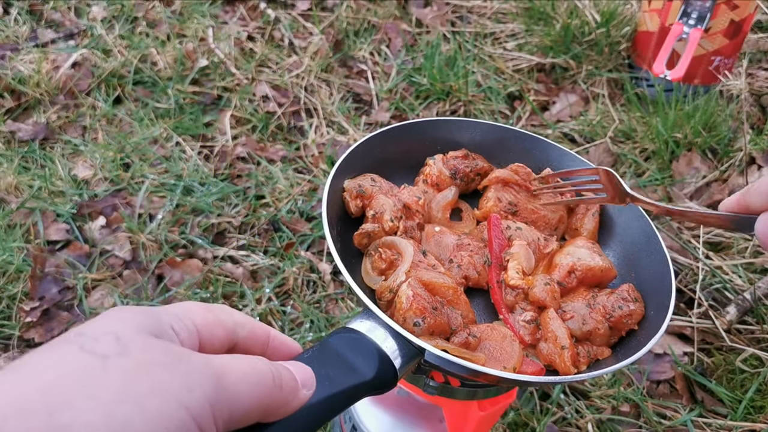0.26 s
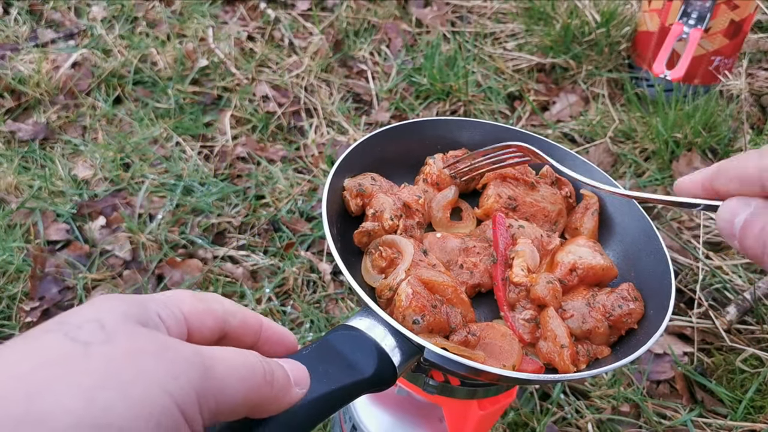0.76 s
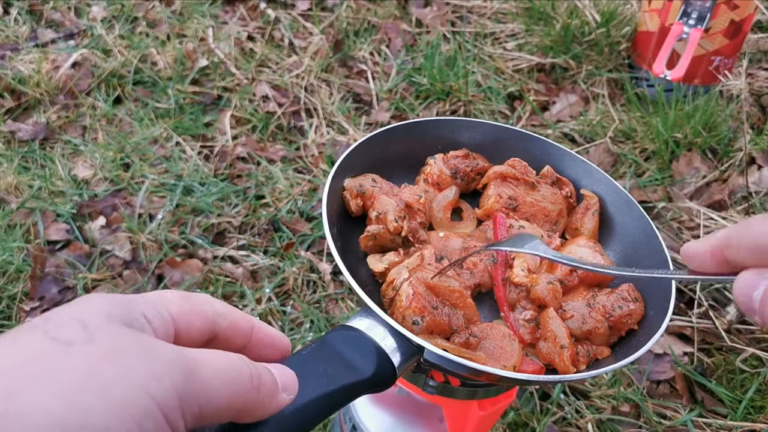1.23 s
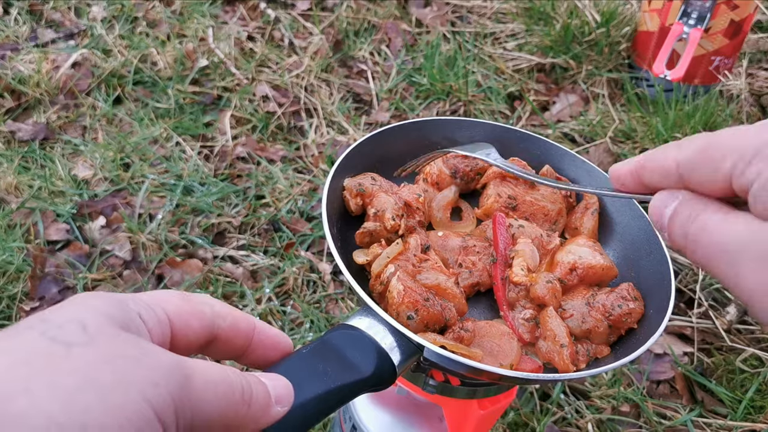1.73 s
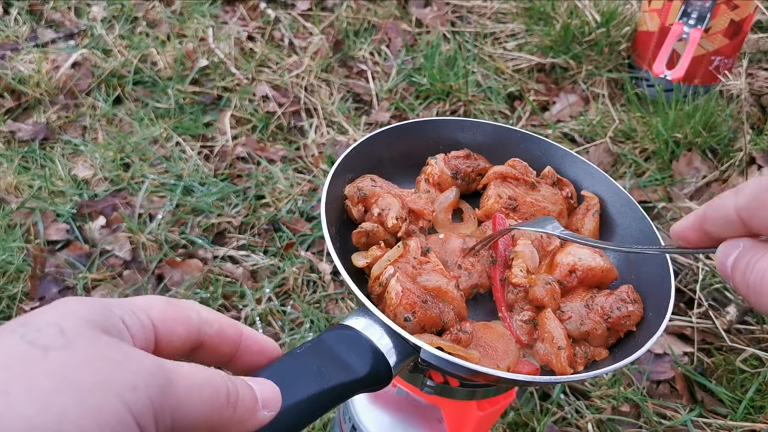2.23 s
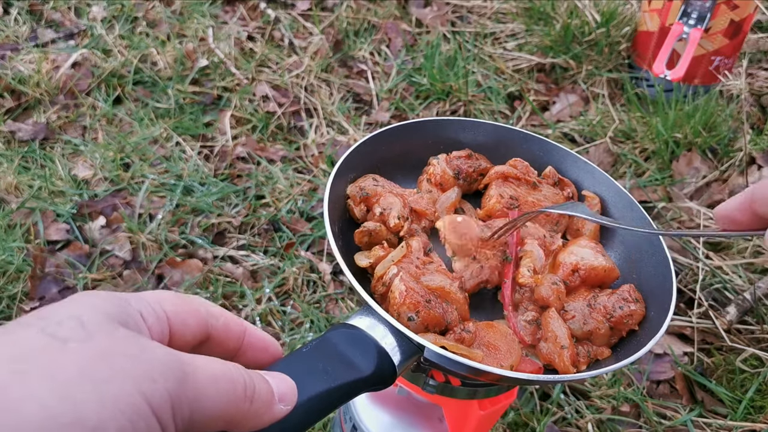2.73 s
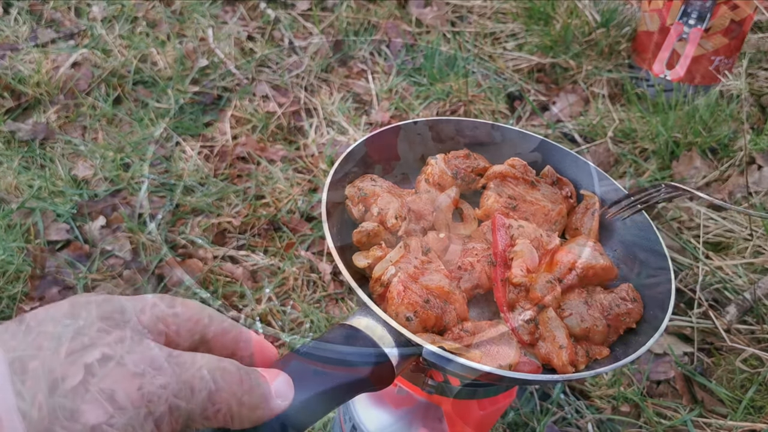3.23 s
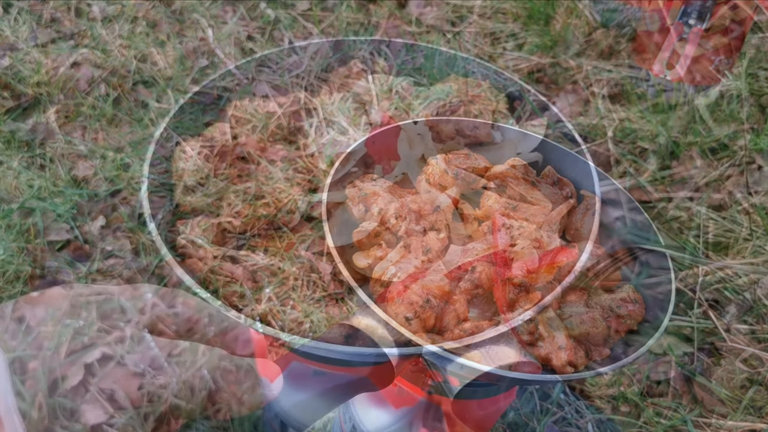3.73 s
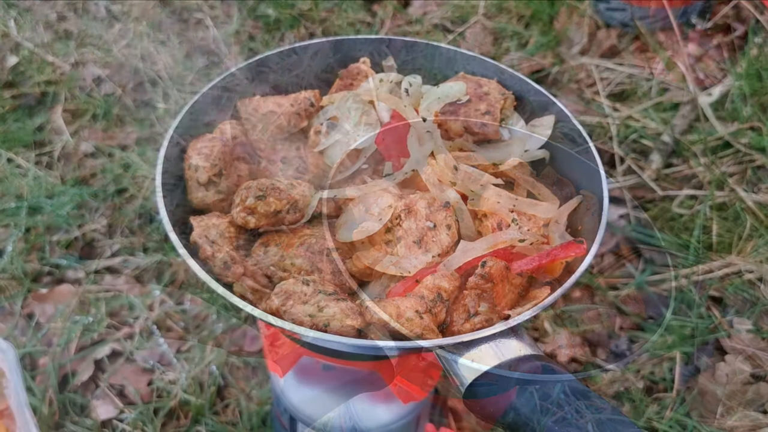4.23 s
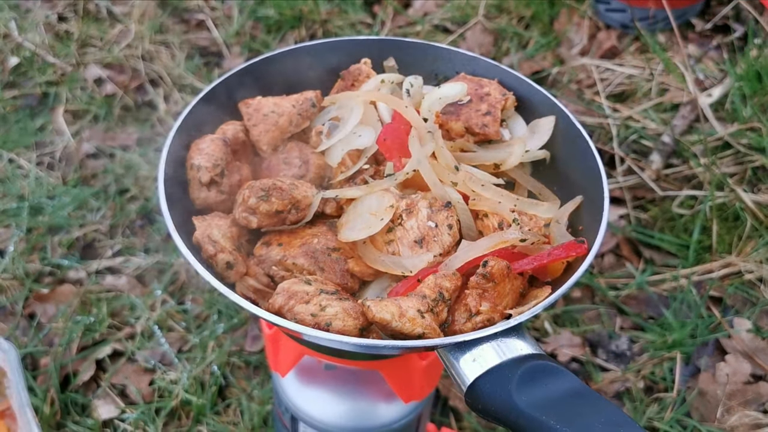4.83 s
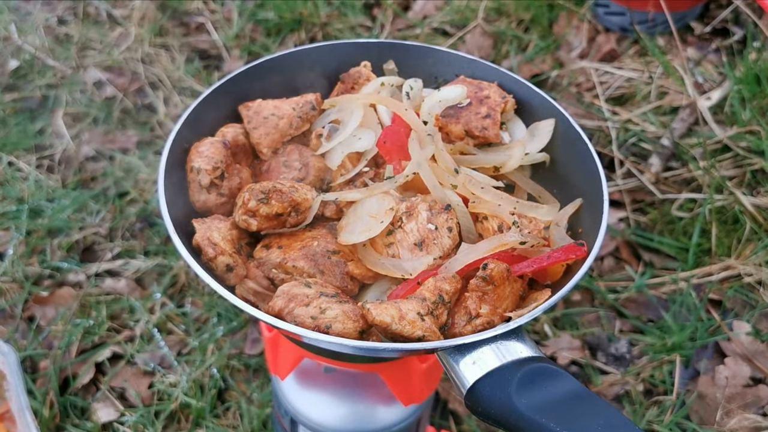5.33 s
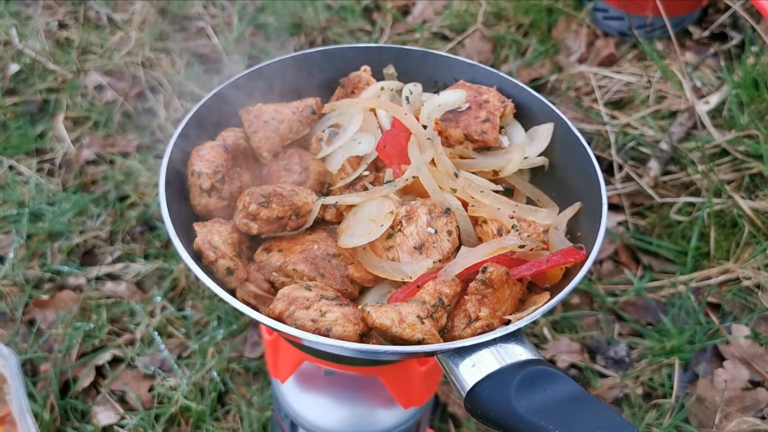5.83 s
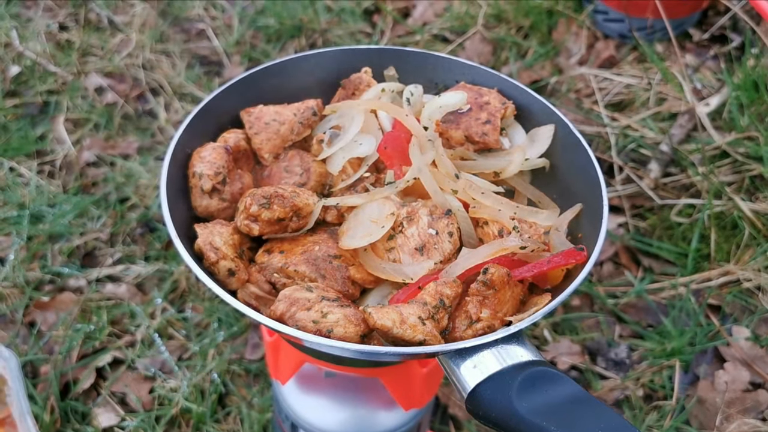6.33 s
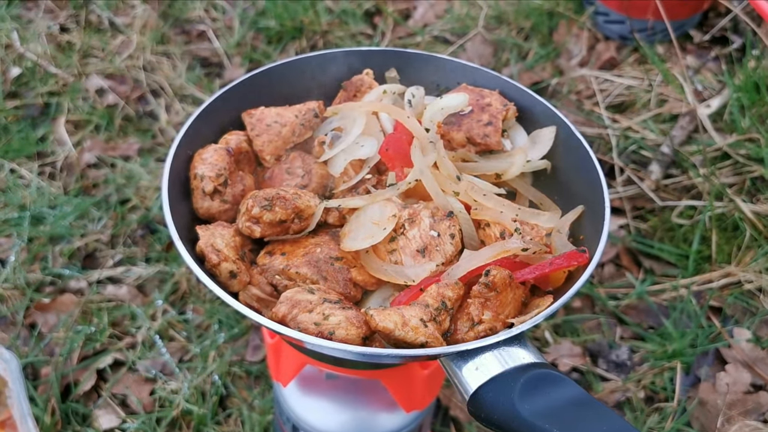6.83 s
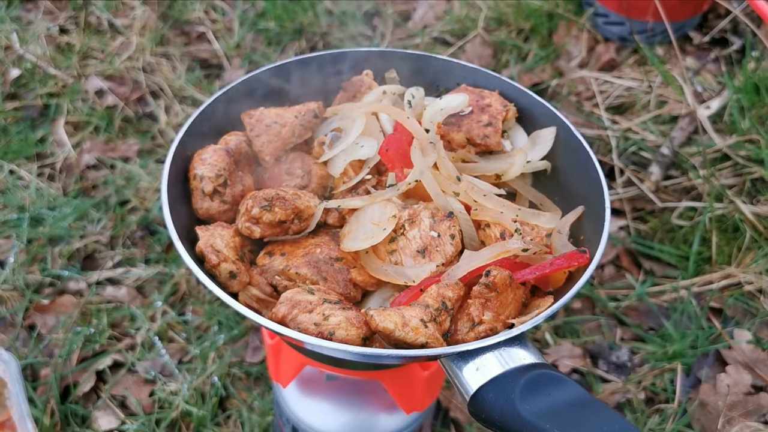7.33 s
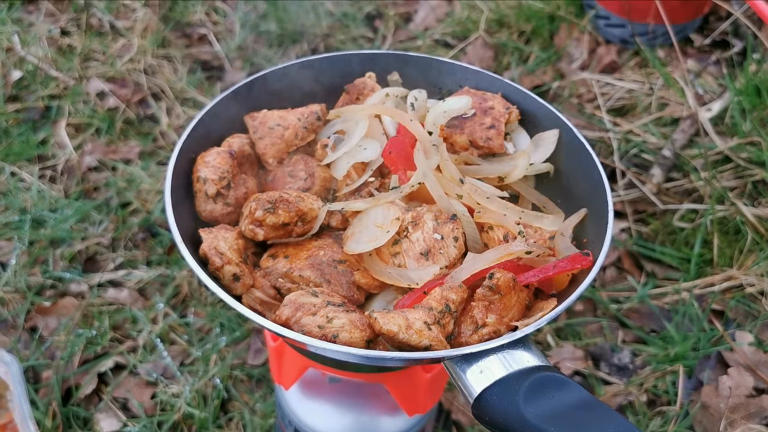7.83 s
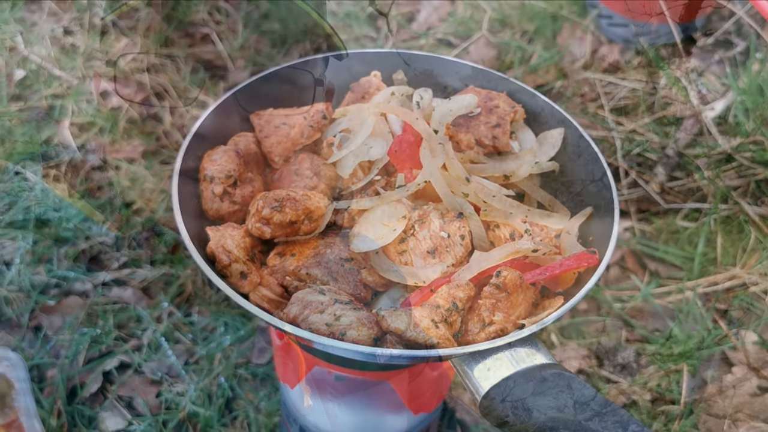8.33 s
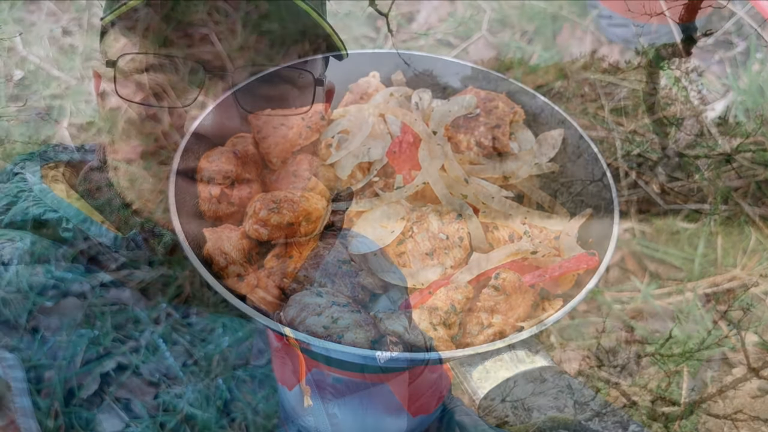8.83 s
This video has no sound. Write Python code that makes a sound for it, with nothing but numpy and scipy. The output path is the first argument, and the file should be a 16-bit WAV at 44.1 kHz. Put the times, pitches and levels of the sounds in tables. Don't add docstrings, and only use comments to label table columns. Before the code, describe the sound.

Quiet gas rush and delicate bubbling from a far mono microphone, with small metallic and fatty ticks as a fork turns meat, and hissing squirts of juice. A blink of silence, then much louder frying close up in stereo, the burner roaring and humming low in spells, bubbles fizzing, hot fat snapping and spitting irregularly. Another blink of silence, then only faint open air with a low wind thump.

```python
import sys
import numpy as np
from scipy import signal
from scipy.fft import rfft, irfft, next_fast_len
from scipy.io import wavfile
from scipy.ndimage import uniform_filter1d

SR = 44100
rng = np.random.default_rng(int(sys.argv[2]) if len(sys.argv) > 2 else 0)


def volts_from_db(level):
    exponent = np.asarray(level, float) / 20
    return 10 ** exponent


def to_wav(sig):
    pcm = np.clip(np.atleast_2d(sig), -1, 1) * 32767
    pcm = np.round(pcm).astype(np.int16)
    wavfile.write(sys.argv[1], SR, pcm.T)


N = 399987
SIZE = next_fast_len(N + 8192)
HZ = np.maximum(np.arange(SIZE // 2 + 1) * SR / SIZE, 1.0)


def rms_one(x):
    return x / np.sqrt(np.mean(x ** 2) + 1e-20)


def in_time(rows):
    s, *columns = np.transpose(rows)
    return [np.interp(np.arange(N) / SR, s, column) for column in columns]


def at_hz(points):
    hz, value = np.array(points).T
    return np.interp(np.log(HZ), np.log(hz), value)


def bells(bumps):
    return sum(height / (1 + (2 * (HZ - hz) / max(width, 5)) ** 2) for hz, width, height in bumps)


def above(hz):
    return 1 / np.sqrt(1 + (hz / HZ) ** 6)


def drift(rate):
    r = np.exp(-40 * np.pi * rate / SR)
    steps = rng.standard_normal(N // 20 + 4002)
    slow = signal.lfilter([1], [1, -2 * r, r * r], steps)[4000:]
    return np.interp(np.arange(N) / 20, np.arange(len(slow)), rms_one(slow - slow.mean()))


def fade(full_s, silent_s):
    share = (np.arange(N) / SR - silent_s) / (full_s - silent_s)
    return 20 * np.log10(np.clip(share, 0.01, 1))


def path(tilt, bumps):
    cepstrum = irfft(np.log(volts_from_db(at_hz(tilt) + bells(bumps))), SIZE)
    cepstrum[1:SIZE // 2] *= 2
    cepstrum[SIZE // 2 + 1:] = 0
    return np.exp(rfft(cepstrum))


def through(x, way):
    return irfft(rfft(x, SIZE) * way, SIZE)[..., :N]


def heard(spectrum):
    x = irfft(spectrum, SIZE)[..., :N]
    return x / np.std(np.atleast_2d(x).mean(axis=0))


def both_ports(first, other):
    # (frequency [Hz], share [0-1])
    shared_curve = [(25, 0.9), (60, 0.98), (300, 1.02), (1100, 1.01), (1500, 0.62), (3000, 0.79),
                    (5000, 0.6), (7000, 0.27), (10000, 0.14), (15700, 0.17)]
    # (frequency [Hz], width [Hz], change of share [0-1])
    shared_bumps = [(395, 51, -0.51), (414, 21, -0.35), (1307, 170, -0.45), (1433, 115, 0.34),
                    (1860, 93, -0.43), (2060, 165, 0.18), (2460, 197, -0.47), (3260, 150, -0.67),
                    (3740, 150, -0.52), (4660, 150, -0.3), (4900, 240, -0.43), (5540, 150, -0.46),
                    (6300, 390, -0.26), (9740, 390, 0.35), (11860, 600, 0.19), (13580, 150, 0.37)]
    alike = np.clip(at_hz(shared_curve) + bells(shared_bumps), 0, 1)
    return np.array([first, alike * first + np.sqrt(1 - alike ** 2) * other])


def flame(flutter_db):
    return rfft(rng.standard_normal((2, N)) * volts_from_db(flutter_db * drift(5.9)), SIZE)


def fizz(per_s, size_db, clump_db, sharp, hiss_db, scatter_ms, count, biggest):
    born = rng.random(N) < per_s * volts_from_db(clump_db * (drift(40) + 0.7 * drift(9))) / SR
    sizes = born * volts_from_db(size_db * np.minimum(rng.exponential(1, N), biggest)) * rng.choice([-1, 1], N)
    dealt = rng.integers(0, count, N)
    shift = (rng.standard_normal(N) * scatter_ms * SR / 1000).astype(int)
    moved = np.clip(np.arange(N) + shift, 0, N - 1)
    grains, power = 0, 0
    for k, hz in enumerate(np.geomspace(1100, 17000, count)):
        burst = 1 / (1 + 1j * sharp * (HZ / hz - hz / HZ))
        mine = rms_one(sizes * (dealt == k))
        versions = [mine]
        if scatter_ms > 0:
            versions.append(np.bincount(moved, mine, N))
        grains = grains + rfft(versions, SIZE) * burst
        power = power + np.abs(burst) ** 2
    breath = volts_from_db(1.56 * drift(34) + 0.15 * drift(0.15))
    hiss = rfft(rng.standard_normal((len(grains), N)) * breath, SIZE)
    return grains / np.sqrt(power) + volts_from_db(hiss_db) * hiss


def with_parts(rows, parts):
    extra = [(s, db + part_db, hz * ratio, -60) for ratio, part_db in parts for s, db, hz, _ in rows]
    return list(rows) + extra


def pops(rows, t60, tail_db, bright_db, snap_db, way):
    out, t = np.zeros(N + 1024), np.arange(1024) / SR
    for s, db, hz, crack_db in rows:
        noise = rng.standard_normal(1024)
        tail = volts_from_db(tail_db - 60 * t / (5 * t60)) * uniform_filter1d(noise, size=30) * 5
        attack = 1 - np.exp(-t / 0.00015)
        ring = np.sin(2 * np.pi * hz * t) * (volts_from_db(-60 * t / t60) + tail) * attack
        crack = volts_from_db(crack_db + bright_db) * np.diff(noise, prepend=0) * volts_from_db(-60 * t / (0.9 * t60))
        crack[:4] += volts_from_db(snap_db) * np.hanning(6)[1:5]
        out[round((s + 0.0008) * SR):][:len(t)] += volts_from_db(db) * (ring + crack)
    middle = np.sqrt(np.mean(np.abs(np.atleast_2d(way)[0, (HZ > 2800) & (HZ < 6000)]) ** 2))
    return through(out[:N], way / middle)


def spits(rows, cycles, gain_db, way):
    out, t = np.zeros(N + 512), np.arange(256) / SR
    late_s = 0.0009
    near = np.sqrt(uniform_filter1d(np.abs(np.atleast_2d(way).mean(axis=0)) ** 2, size=SIZE // 30))
    for (s, db, hz), turn in zip(rows, rng.random(len(rows))):
        shape = volts_from_db(-60 * t * hz / cycles) * (1 - np.exp(-2 * t * hz))
        ring = np.sin(2 * np.pi * (hz * t + turn)) * shape
        out[round((s + late_s) * SR):][:len(t)] += volts_from_db(db + gain_db) * ring / near[round(hz * SIZE / SR)]
    return through(out[:N], way)


def open_air():
    # (frequency [Hz], level [dB per Hz])
    wind_tilt = [(25, -10.4), (60, 0.0), (130, -21.2), (300, -27.1), (1000, -28.1), (2500, -34.2),
                 (4000, -40.2), (6500, -33.3), (8000, -46.4), (13000, -45.9), (15800, -53.3)]
    # (frequency [Hz], second port's cut or left minus right [dB])
    balance = [(60, -1), (110, 11), (200, 4), (380, 3), (700, 5), (1290, 12), (2380, 8), (4400, 4),
               (8120, 5.5), (15000, 11)]
    # (time [s], peak level [dB], pitch [Hz], crack level [dB])
    lone_tick = [(8.918, -65, 6500, -4.)]
    shared = rfft(rng.standard_normal(N), SIZE)
    own = rfft(rng.standard_normal((2, N)), SIZE)
    top, lean = above(450), volts_from_db(at_hz(balance))
    air = (shared * np.sqrt(1 - top ** 2) + own * top) * volts_from_db(at_hz(wind_tilt)) / [lean ** 0, lean]
    tick = pops(lone_tick, t60=0.0028, tail_db=-20, bright_db=0, snap_db=-6, way=above(3500))
    return volts_from_db(-61.5) * rms_one(irfft(air, SIZE)[:, :N]) + tick


def nudge():
    time_s, length_s, level_db = 1.945, 0.038, -67
    band = signal.butter(2, (150, 600), "band", fs=SR, output="sos")
    scuff = rms_one(signal.sosfilt(band, rng.standard_normal(N)))
    return volts_from_db(level_db) * scuff * np.exp(-((np.arange(N) / SR - time_s) / length_s) ** 2)


def squirts_and_scrapes():
    # (start [s], hold [s], level [dB], starting pitch of the middle band [Hz], upper bands
    # [dB])
    jets_and_scrapes = [(.76, .05, -81, 4480, -2), (0.803, 0.05, -72, 4480, -9), (0.867, 0.027, -81, 4330, 12.5),
                        (1.025, 0.054, -75.5, 4340, 2), (1.14, .04, -77, 4330, -6.),
                        (2.934, 0.36, -72.5, 4470, -3), (2.994, 0.1, -73, 4450, 4)]
    # (pitch ratio [1], half width [Hz], level [dB])
    bands = [(.765, 120., -4.5), (1.001, 140., 2.5), (1.31, 200., 1.5), (1.45, 900., -7), (2.17, 350., -23)]
    attack_s, fall_db_per_s, sag_hz_per_s = 0.047, 124, 730
    out, age, rough_db = np.zeros(N), np.arange(SR) / SR, 1.4 * drift(80)
    for s, hold_s, level_db, hz, upper_db in jets_and_scrapes:
        fall = volts_from_db(-fall_db_per_s * np.maximum(age - attack_s - hold_s, 0))
        shape = np.clip(age / attack_s, 0, 1) ** 2 * fall
        for k, (ratio, half_hz, db) in enumerate(bands):
            lowpass = signal.butter(2, half_hz, fs=SR, output="sos")
            slow = signal.sosfilt(lowpass, rng.standard_normal((2, SR)))
            phase = 2 * np.pi * ratio * np.cumsum(hz - sag_hz_per_s * age) / SR
            band = rms_one(slow[0] * np.cos(phase) + slow[1] * np.sin(phase))
            band_db = level_db + db + upper_db * (k > 1) + rough_db[k * SR:][:SR]
            out[round(s * SR):][:SR] += shape * volts_from_db(band_db) * band
    return out


def far_ticks(way, top):
    # (time [s], peak level [dB], pitch [Hz], crack level [dB])
    fork_ticks = [(0.2004, -53, 4270, -19), (0.742, -51, 3100, -25), (0.8185, -47, 4610, -28),
                  (0.8949, -49, 4320, -25), (1.26, -47, 4350, -24), (1.3004, -53, 4170, -21),
                  (1.3947, -49, 4440, -22), (1.723, -50, 5700, -24), (1.8163, -52, 5730, -12),
                  (2.1959, -49, 5960, -22), (2.6205, -38.5, 4360, -24), (2.632, -52, 4400, -19),
                  (2.7362, -55, 4170, -24), (2.9934, -43, 4470, -26), (3.0185, -46, 4390, -33),
                  (3.0355, -52, 4540, -28), (3.051, -44, 4300, -35), (3.116, -44, 4330, -32),
                  (3.287, -44, 4230, -31), (3.5444, -55, 5610, -19)]
    # (pitch ratio [1], level [dB])
    tick_rings = [(.42, -16), (.75, -13), (1.3, -1.5), (1.5, -7)]
    # (time [s], peak level [dB], pitch [Hz])
    droplets = [(0.0862, -56, 6940), (0.1615, -59, 5750), (0.1785, -53, 5770), (0.2224, -55, 5820),
                (0.2448, -58, 5490), (0.2758, -58, 4330), (0.4928, -56, 4220), (0.5806, -56, 5840),
                (0.5955, -53, 5620), (0.7721, -56, 4260), (0.8016, -53, 4140), (0.851, -51, 4310),
                (0.8804, -50, 4340), (0.9936, -54, 5610), (1.0535, -49, 4370), (1.0715, -52, 4470),
                (1.1902, -56, 4340), (1.2121, -54, 4330), (1.6935, -53, 5750), (2.1765, -55, 5700),
                (2.2134, -55, 5910), (2.2388, -56, 5500), (2.358, -51, 5920), (2.814, -58, 4350),
                (2.9597, -55, 4470), (3.0754, -53, 4560), (3.1344, -50, 4360), (3.2274, -48, 4080),
                (3.3004, -51, 5750), (3.3283, -54, 4160), (3.4441, -56, 5800), (3.4685, -56, 5650),
                (3.683, -57, 4230)]
    ticks = pops(with_parts(fork_ticks, tick_rings), t60=0.0022, tail_db=-4, bright_db=26, snap_db=-26,
                 way=way * above(1500))
    return volts_from_db(0.5) * ticks + spits(droplets, cycles=9.0, gain_db=8.0, way=way * top)


def far_pan():
    # (frequency [Hz], level [dB per Hz])
    far_tilt = [(25, -3), (60, -13), (130, -15), (250, -4), (500, 0), (1000, 0.5), (2000, -7.5),
                (4000, -13.5), (7000, -15.5), (8500, -28), (10000, -35), (15800, -50)]
    # (frequency [Hz], width [Hz], level [dB])
    far_bumps = [(33, 13, -3.3), (99, 40, 4.1), (203, 26, 11.5), (377, 94, 6.2), (686, 274, -13.0),
                 (825, 50, -4.5), (895, 60, 3.5), (947, 95, 4.0), (1038, 104, -4.2), (1248, 200, 9.4),
                 (1800, 450, -5.5), (2350, 235, 3.8), (2800, 168, -9.6), (3300, 198, 3.9),
                 (3700, 350, -4.4), (4350, 350, 6.1), (5250, 210, -5.6), (5750, 350, 7.5)]
    out_db = fade(full_s=3.1, silent_s=4.33)
    lift_db = -6 * np.exp(-((np.arange(N) / SR - 2.865) / 0.04) ** 2)
    way, top = path(far_tilt, far_bumps) * above(25), above(2400)
    roar = heard(flame(flutter_db=0.6)[0] * way * np.sqrt(1 - top ** 2))
    grains = fizz(per_s=3800, size_db=3.5, clump_db=3.5, sharp=2.3, hiss_db=-1.5, scatter_ms=0,
                  count=10, biggest=4.0)
    sizzle = heard(grains[0] * way * top)
    self_noise = volts_from_db(-94 + out_db) * rng.standard_normal(N)
    pan = volts_from_db(-63 + out_db) * roar + volts_from_db(-68.5 + out_db + lift_db) * sizzle
    return pan + squirts_and_scrapes() + far_ticks(way, top) + nudge() + self_noise


def near_ways():
    # (frequency [Hz], level [dB per Hz])
    left_tilt = [(25, -5.5), (50, -0.6), (100, -5.7), (200, -4.3), (500, -8.8), (1000, 0.0), (2000, -6.6),
                 (4000, -15.1), (7000, -8.9), (9000, -12.4), (10000, -16.0), (12000, -20.9), (15000, -24.0),
                 (15700, -26.3)]
    # (frequency [Hz], width [Hz], level [dB])
    left_bumps = [(36, 7, -2.0), (69, 14, 3.1), (91, 12, -3.9), (131, 26, 9.9), (144, 11, 3.8),
                  (261, 13, -5.2), (261, 52, 12.6), (360, 72, -12.2), (864, 173, 2.4), (1138, 228, -5.8),
                  (1500, 120, 4.8), (1620, 567, -13.9), (1900, 152, 2.4), (2220, 178, -3.8),
                  (2540, 127, 1.8), (2660, 133, -3.5), (2980, 149, 2.1), (3300, 240, -4.1),
                  (3420, 1050, 9.1), (4180, 240, 4.6), (4580, 150, 1.7), (4860, 150, 2.9), (5460, 390, 1.9),
                  (6620, 150, 2.8), (7540, 150, 4.7), (7660, 240, -1.7), (7980, 240, 2.1),
                  (10180, 1050, -6.0), (14180, 1050, 3.0)]
    # (frequency [Hz], level [dB per Hz])
    right_tilt = [(25, -8.0), (50, -3.1), (100, -6.9), (200, -0.8), (500, -6.5), (1000, -1.8), (2000, 0.0),
                  (4000, -5.3), (6900, -7.6), (7400, -23.0), (9000, -17.4), (12000, -16.7), (15000, -20.7),
                  (15700, -25.1)]
    # (frequency [Hz], width [Hz], level [dB])
    right_bumps = [(69, 14, 3.4), (91, 12, -3.7), (131, 26, 5.8), (137, 18, 4.9), (189, 66, -4.9),
                   (261, 13, -4.5), (261, 52, 10.8), (329, 26, -2.2), (414, 83, -15.5), (864, 302, 6.7),
                   (1192, 155, -10.8), (1780, 356, -10.2), (1860, 93, -5.5), (2260, 113, -2.5),
                   (2460, 861, 3.8), (2660, 133, -3.4), (2940, 147, 3.0), (3180, 150, -2.3),
                   (3260, 150, -4.7), (3780, 240, -8.0), (4780, 240, -3.6), (5460, 150, -2.7),
                   (6460, 1050, -4.8), (8540, 240, -4.7), (9340, 150, -5.5), (10660, 240, 3.2),
                   (11900, 900, -4.2), (12780, 240, 5.2), (13380, 1050, 5.7)]
    # (frequency [Hz], phase [rad])
    right_lead = [(25, 0), (365, .3), (395, -2.2), (430, .7), (1500, 1.1), (1800, -.1), (1950, 1.7),
                  (3150, -.4), (3300, 1.6), (3850, 1.5), (4300, .5), (4600, -1.8), (5300, -.9),
                  (6300, -2.8)]
    right_db, right_lag_ms = -6.0, 0.283
    left = path(left_tilt, left_bumps)
    shade = volts_from_db(right_db + at_hz(right_tilt) + bells(right_bumps)) / np.abs(left)
    turn = at_hz(right_lead) - 2 * np.pi * HZ * right_lag_ms / 1000
    return left * np.array([shade ** 0, shade * np.exp(1j * turn)])


def hum():
    # (start [s], length [s], pitch [Hz], level [dB], octave level [dB])
    spell_rows = [
        (3.777, 0.54, 137.1, -49.5, -6),
        (4.292, 0.73, 138.8, -46, -17),
        (4.982, 0.31, 136, -41, -4),
        (5.289, 0.34, 130, -46, -0.5),
        (5.683, 0.49, 125.4, -46.5, 5),
        (6.379, 0.57, 136, -46, -12),
        (7.16, 0.32, 136.6, -46, 0),
        (7.73, 0.6, 131.3, -44.5, -4.5),
        (8.362, 0.31, 131.2, -46.5, -9),
        (8.641, .25, 138.5, -48, -13),
    ]
    edge_s, rest_share = 0.053, 0.092
    t = np.arange(N) / SR
    hz, rest_db, octave_db = in_time([(s + length / 2, *rest) for s, length, *rest in spell_rows])
    spells = np.zeros(N)
    for s, length, _, db, _ in spell_rows:
        spells += volts_from_db(db) * np.clip(np.minimum(t - s, s + length - t) / edge_s, 0, 1)
    phase = 2 * np.pi * np.cumsum(hz * (1 + 0.01736 * drift(5.9))) / SR
    tone = np.sin(phase) * volts_from_db([[3.2], [-4.2]])
    octave = volts_from_db(octave_db + 4.7 * drift(5.3)) * np.sin(2 * phase) * volts_from_db([[1.8], [-2.2]])
    strength = volts_from_db(-7.5 + 2.9 * drift(11.0)) * (spells + rest_share * volts_from_db(rest_db))
    return np.sqrt(2) * strength * (tone + octave)


def near_flame(ways, top, edit_db):
    # (frequency [Hz], width [Hz], level [dB])
    hum_dips = [(136.2, 16, -9.5), (251.4, 17, -6.5)]
    low = above(390)
    burn = both_ports(*flame(flutter_db=0.5)) * ways
    rumble = heard(burn * (1 - low) * volts_from_db(bells(hum_dips)))
    roar = heard(burn * low * np.sqrt(1 - top ** 2))
    return volts_from_db(-48 + edit_db) * rumble + volts_from_db(-44 + edit_db) * roar + hum()


def near_sizzle(ways, top, sizzle_db):
    grains = fizz(per_s=6000, size_db=5.0, clump_db=2.5, sharp=2.9, hiss_db=-1.0, scatter_ms=0.3,
                  count=14, biggest=3.32)
    return volts_from_db(sizzle_db) * heard(both_ports(*grains) * ways * top)


def near_fat(ways):
    # (time [s], peak level [dB], pitch [Hz], crack level [dB])
    fat_pops = [(4.337, -27, 2900, -19), (4.3784, -19, 3100, -18), (4.4497, -34, 3040, -12),
                (4.505, -25, 3550, -21), (4.6789, -31, 6820, -19), (5.2404, -25, 2980, -8),
                (5.299, -26, 2970, -5), (5.521, -28, 3080, -10), (5.6083, -26, 4100, -14),
                (5.6763, -22, 3590, -14), (5.6995, -22.5, 3090, -19), (5.7812, -23, 6670, -18),
                (5.9796, -17.5, 3040, -9), (6.3752, -36, 3300, 0), (6.436, -24, 2950, -16),
                (6.8072, -22, 4360, -18), (6.8808, -23, 3510, -7), (6.9233, -29, 2910, -6),
                (7.025, -31, 3050, -18), (7.0648, -31, 2980, -6), (7.145, -34, 3570, -11),
                (7.3044, -28, 4340, -3), (7.409, -22, 7200, -14), (7.679, -18, 2980, -15),
                (7.6832, -20, 3120, -25), (7.7685, -23, 3700, -17), (7.846, -24, 4176, -17),
                (7.9977, -30, 2940, -25), (8.0987, -29, 3040, -6), (8.22, -38, 3205, -20),
                (8.275, -28, 3600, -20)]
    # (pitch ratio [1], level [dB])
    pop_rings = [(.32, -29), (.5, -3.5), (1.3, -2.5)]
    # (time [s], peak level [dB], pitch [Hz])
    low_drops = [(3.8064, -44, 2940), (3.8676, -39, 2990), (3.921, -31, 3700), (4.001, -25.5, 3000),
                 (4.0931, -27, 3580), (4.1994, -34, 3570), (4.2617, -32, 4200), (4.314, -31, 2920),
                 (4.574, -28, 3470), (4.7162, -29, 3490), (4.8574, -28, 2920), (4.9427, -33, 3060),
                 (5.011, -37, 3020), (5.094, -29, 3140), (5.1118, -30, 2950), (5.345, -31, 3140),
                 (5.465, -41, 4100), (5.5394, -45, 3520), (5.5573, -31, 3020), (5.8411, -40, 3100),
                 (5.8636, -38, 3140), (5.9589, -30, 3120), (6.074, -32, 2960), (6.1664, -26, 4150),
                 (6.1973, -28.5, 2970), (6.2327, -30, 2980), (6.255, -36, 3590), (6.2906, -27, 4250),
                 (6.318, -35, 2980), (6.416, -28, 2960), (6.6129, -32, 3120), (6.7251, -28, 2880),
                 (6.8593, -31, 2920), (7.3647, -32, 2950), (7.4126, -32, 3000), (7.4924, -49, 3020),
                 (7.5862, -25, 2470), (7.7072, -25, 2940), (7.8042, -30, 4180), (7.868, -24, 3590),
                 (7.9329, -23, 3580), (8.13, -29, 2990), (8.6527, -37, 3110)]
    mid_drops = [(3.984, -29, 6880), (4.0249, -28, 7520), (4.1514, -34, 5340), (4.3641, -31, 6580),
                 (4.3791, -30, 6040), (4.4634, -28, 6770), (4.5368, -27, 6670), (4.6315, -28, 7530),
                 (4.6789, -26, 6830), (4.7118, -34, 6000), (4.9425, -31, 6030), (5.1507, -34, 6500),
                 (5.2386, -37, 6780), (5.2635, -32, 6550), (5.4027, -27, 6260), (5.52, -36, 5350),
                 (5.606, -29, 7820), (5.6761, -38, 5030), (5.7001, -35, 5590), (5.7799, -31, 6620),
                 (5.8885, -25, 6790), (5.9535, -26, 9080), (5.9904, -24, 8120), (6.0692, -27, 6590),
                 (6.1236, -23, 7530), (6.1667, -30, 6860), (6.2079, -34, 7220), (6.3564, -24, 6590),
                 (6.375, -33, 5560), (6.401, -32, 7500), (6.5496, -33, 6580), (6.621, -30, 6630),
                 (6.6559, -27, 5350), (6.731, -23, 6780), (6.7956, -31, 6870), (6.808, -26, 7510),
                 (6.8569, -29, 6730), (6.8868, -22.5, 7480), (6.9103, -31, 7080), (6.9233, -28, 6610),
                 (6.9457, -27, 6640), (7.091, -33, 7530), (7.142, -35, 5960), (7.1562, -27, 6630),
                 (7.287, -32, 5830), (7.3053, -25, 6690), (7.4078, -23, 7140), (7.475, -35, 6560),
                 (7.519, -27, 6830), (7.5354, -31, 5070), (7.698, -29, 6590), (7.7155, -23, 6810),
                 (7.8462, -34, 5680), (7.9975, -22, 6210), (8.1121, -26, 6400), (8.1769, -37, 5000),
                 (8.2629, -36, 6470), (8.276, -25.5, 6585)]
    high_drops = [(3.8069, -42, 13000), (3.8677, -42, 11700), (3.9186, -39, 12900), (4.0992, -42, 13700),
                  (4.2399, -40, 12300), (4.398, -41, 12300), (4.413, -34, 12200), (4.6425, -39, 13400),
                  (4.9443, -40, 11600), (5.0296, -39, 12900), (5.1348, -34, 12700), (5.2436, -31, 12900),
                  (5.3, -37, 12900), (5.4476, -40, 12800), (5.5205, -30, 12900), (5.7001, -40, 14100),
                  (5.8382, -38, 12800), (5.9081, -39, 12900), (5.9764, -40, 14200), (5.9894, -35, 12660),
                  (6.1655, -47, 14300), (6.2079, -42, 12900), (6.2212, -38, 12600), (6.2924, -36, 12800),
                  (6.3551, -42, 11000), (6.4359, -38, 10400), (6.4943, -48, 11100), (7.0355, -39, 13140),
                  (7.1448, -32, 13300), (7.2241, -45, 11300), (7.287, -42, 11200), (7.3049, -36, 12800),
                  (7.3458, -45, 12800), (7.3733, -40, 13940), (7.498, -40, 13300), (7.5533, -39, 12800),
                  (7.749, -33, 13200), (7.8457, -39, 13000), (7.929, -39, 12900), (7.947, -34, 13400),
                  (7.9976, -43, 10800), (8.0792, -38, 12900), (8.1754, -47, 13100), (8.2343, -41, 13900),
                  (8.367, -40, 14100), (8.4413, -41, 13300), (8.5296, -40, 13400)]
    rows = [(s, db, hz, crack_db - 0.7 * (db + 26)) for s, db, hz, crack_db in fat_pops]
    fat = volts_from_db(-6.5) * pops(with_parts(rows, pop_rings), t60=0.0055, tail_db=-1.5, bright_db=18.5,
                           snap_db=0.5, way=ways)
    fat = fat + spits(low_drops, cycles=7.7, gain_db=5.5, way=ways)
    fat = fat + spits(mid_drops, cycles=10.3, gain_db=7.5, way=ways)
    return fat + spits(high_drops, cycles=11.0, gain_db=14.0, way=ways)


def near_pan():
    in_db = fade(full_s=4.8, silent_s=2.04)
    edit_db = in_db + fade(full_s=8.2, silent_s=9.57) + 0.43 * drift(1.9)
    sizzle_db = -41 + edit_db + 0.28 * in_db
    ways, top = near_ways(), above(1300)
    return near_flame(ways, top, edit_db) + near_sizzle(ways, top, sizzle_db) + near_fat(ways)


def scene():
    t = np.arange(N) / SR
    out = np.zeros((2, N))
    for start_s, end_s, sound in [(0, 3.7661, far_pan()), (3.7994, 8.8661, near_pan()),
                                  (8.8994, 9.1, open_air())]:
        out += sound * ((t >= start_s) & (t < end_s))
    return out


def roll_off(x):
    return signal.sosfilt(signal.butter(12, 16380, fs=SR, output="sos"), x)


def record(dry):
    steep = signal.ellip(14, 0.3, 80, 15720, fs=SR, output="sos")
    mix = signal.sosfilt(steep, dry)
    return roll_off(mix)


dry = scene()
out = record(dry)
to_wav(out)
```